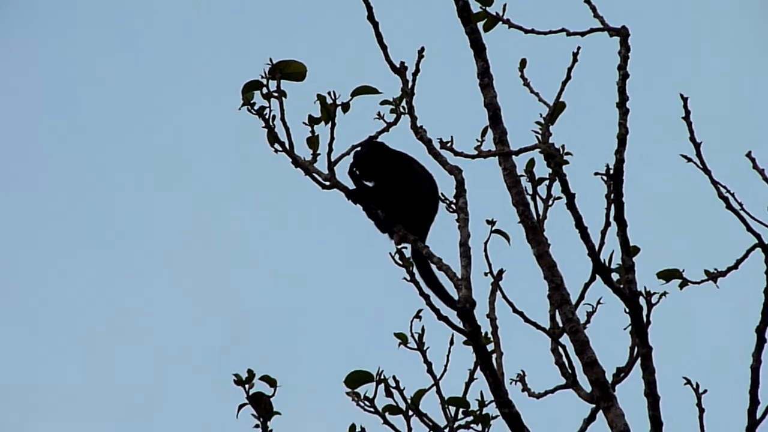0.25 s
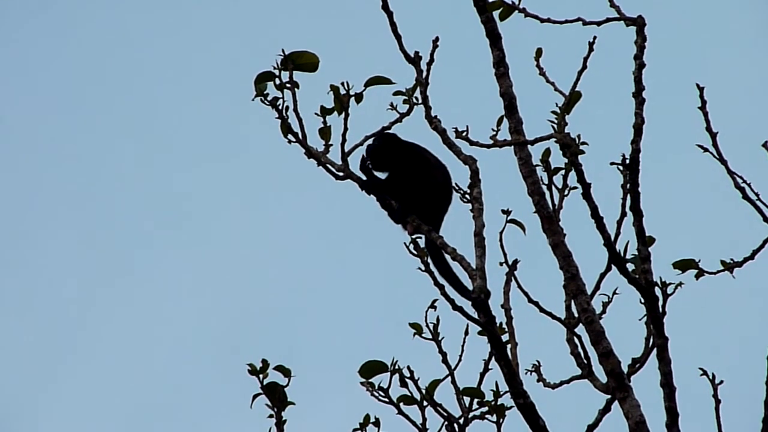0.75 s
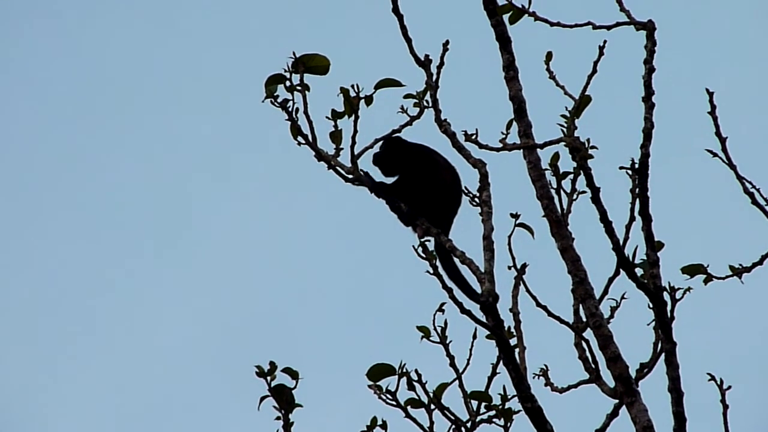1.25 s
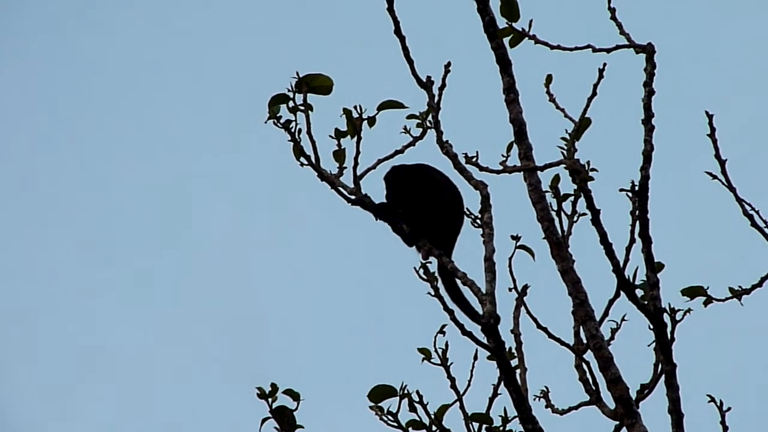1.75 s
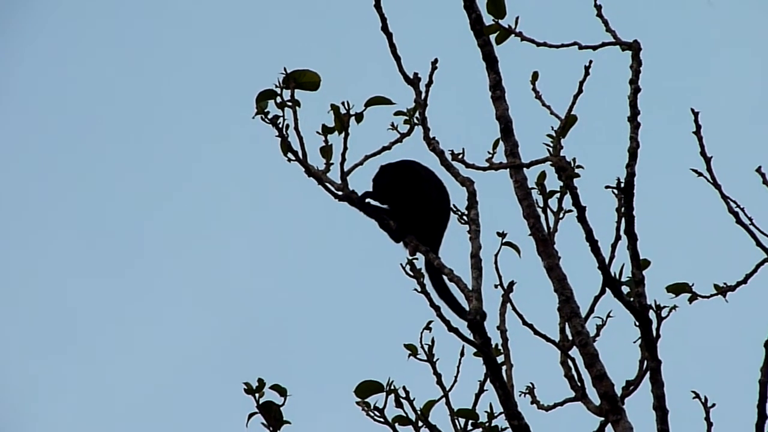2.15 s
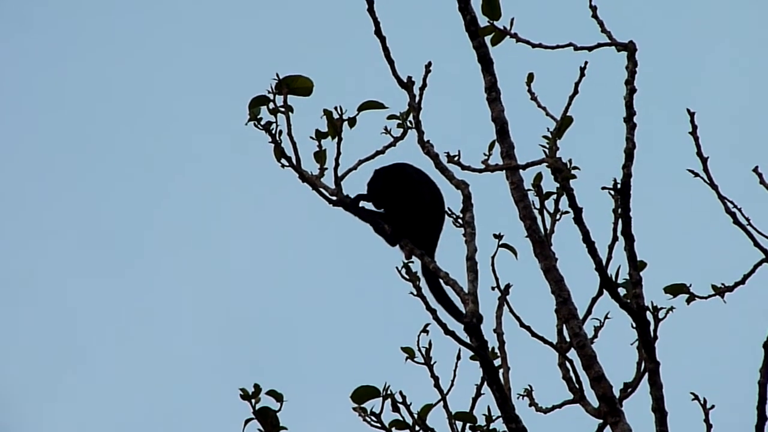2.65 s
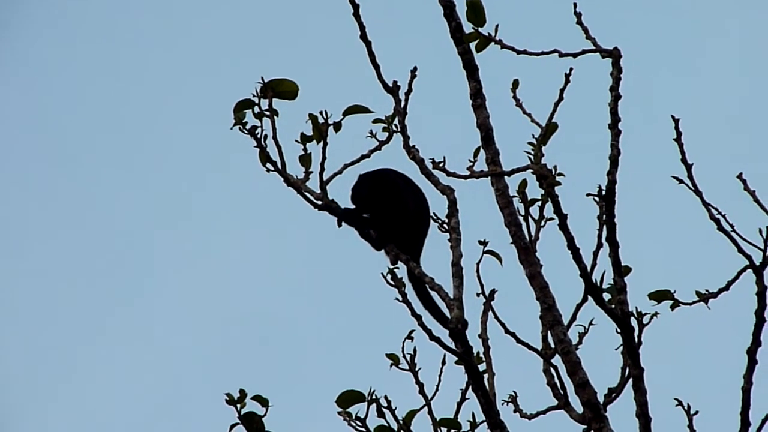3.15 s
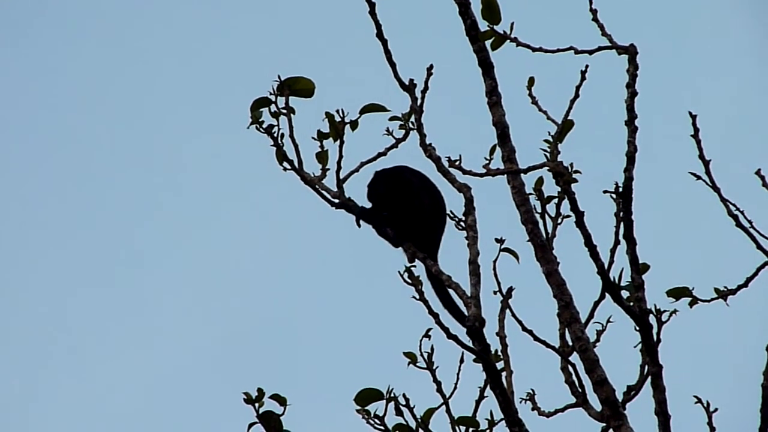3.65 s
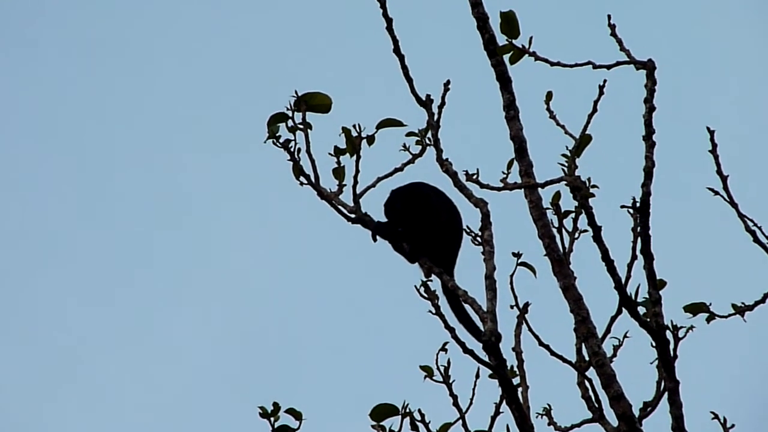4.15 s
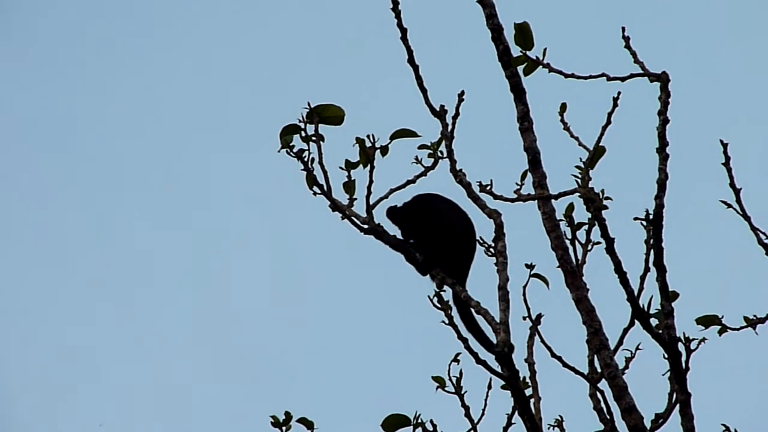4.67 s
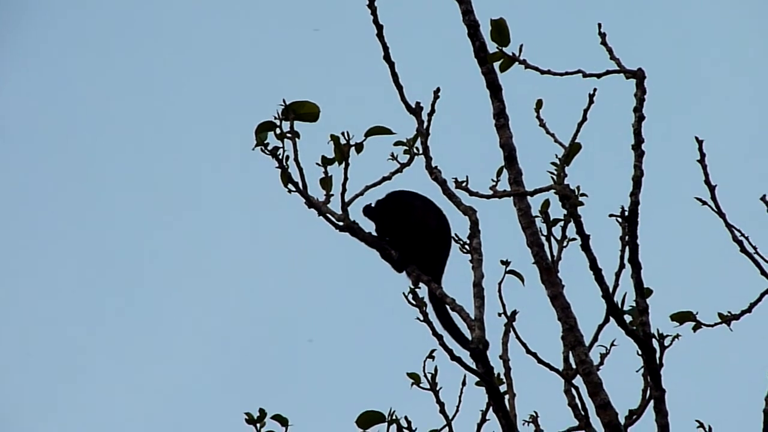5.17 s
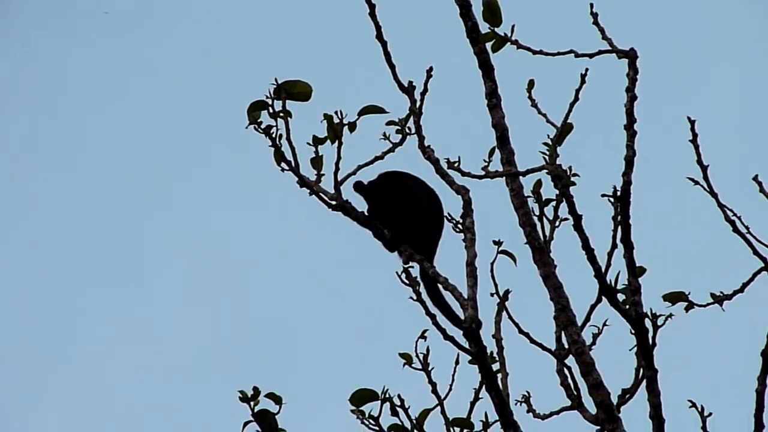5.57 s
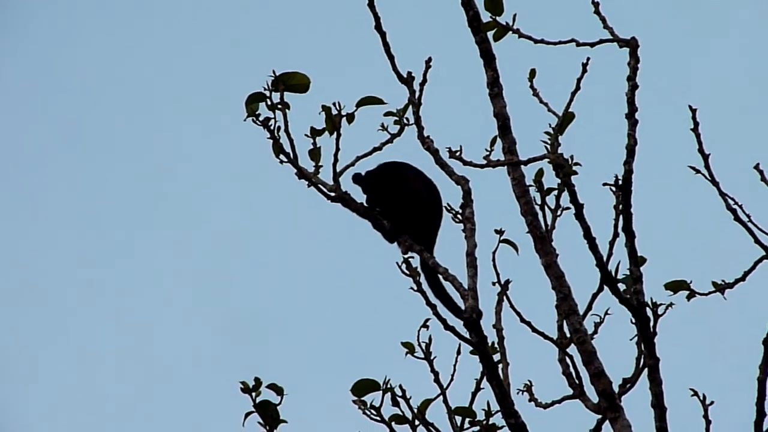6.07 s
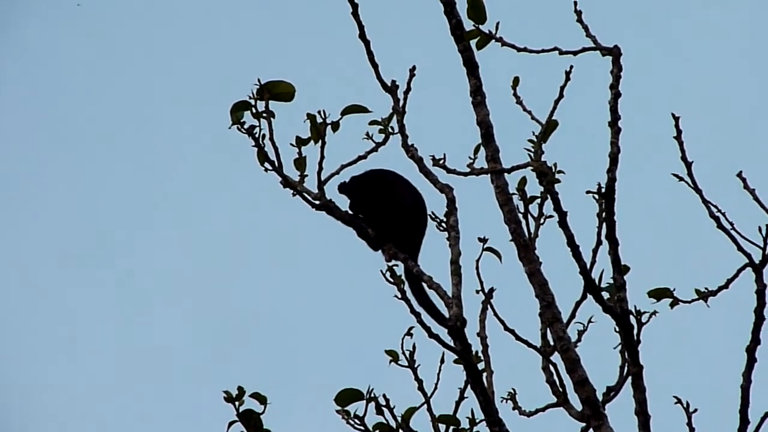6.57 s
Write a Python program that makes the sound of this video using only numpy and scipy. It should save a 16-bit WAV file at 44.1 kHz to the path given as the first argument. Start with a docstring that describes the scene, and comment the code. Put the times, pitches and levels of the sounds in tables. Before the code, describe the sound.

A bird chirps at once over a steady, high, shimmering insect drone and soft distant rush. A nearby lens motor buzzes in quick ticking steps until about 2.5 seconds. Small birds whistle and trill with forest echoes. Sharp clicks on the camera come near 3 seconds, one far louder snap just after 6, then dull bumps. Outdoor wide stereo, handheld camera microphone.

```python
"""A bird's chirp comes first, over a high drone of insects and the short buzzing steps of a lens motor.
More small birds chirp, whistle and trill, with echoes from the trunks, over a soft distant rush.
The motor stops after about 2.5 s; the camera's shell clicks, knocks, bumps and rubs in the hand.
Insects are click trains through resonances, bird notes are gliding tones, the rush is coloured noise,
the motor is a set of jittering tones, and touches on the camera are decaying modes and grainy noise."""
import sys
import numpy as np
from scipy import signal
from scipy.fft import rfft, irfft
from scipy.io import wavfile
from scipy.ndimage import uniform_filter1d

SR = 44100
rng = np.random.default_rng(int(sys.argv[2]) if len(sys.argv) > 2 else 0)


def output_pcm(signal):
    """Save a mono or channel-first signal as 16-bit PCM at the path in sys.argv[1].

    Samples are clipped to [-1, 1] before scaling.
    """
    pcm = np.clip(np.atleast_2d(signal).T, -1, 1) * 32767
    wavfile.write(sys.argv[1], SR, np.round(pcm).astype(np.int16))


N = 300762
TIME = np.arange(N) / SR
FREQ = np.maximum(np.arange(N // 2 + 1) * SR / N, 1)


def undb(db):
    """Turn decibels into a gain."""
    return 10 ** (np.asarray(db) / 20)


def unit(x):
    """Scale a sound to rms 1."""
    return x / np.sqrt(np.mean(x ** 2))


def noise():
    """White noise: all pitches equally."""
    return rng.standard_normal(N)


def walk(rate):
    """A wandering curve, rms 1: it slides in straight lines between random levels, rate per second."""
    hold = int(SR / rate)
    steps = np.repeat(rng.standard_normal(N // hold + 1), hold)
    return unit(uniform_filter1d(steps, hold)[:N])


def curves(table):
    """Draw each column after the first (time_s) as a curve over all samples."""
    time_s, *columns = np.transpose(table)
    return [np.interp(TIME, time_s, column) for column in columns]


def colour(x, points):
    """Filter by a spectrum drawn through (pitch_hz, gain_db) points."""
    hz, db = np.transpose(points)
    gain = undb(np.interp(np.log(FREQ), np.log(hz), db))
    return irfft(rfft(x) * gain, N)


def soften(x, hz):
    """A softer contact takes off the treble above about hz."""
    return signal.lfilter([1], [1, -np.exp(-2 * np.pi * hz / SR)], x)


def resonate(x, hz, width, order=3):
    """A resonance applied several times, so that sound far from its pitch fades steeply; rms 1."""
    response = 1 / (1 + 1j * (FREQ ** 2 - hz ** 2) / (FREQ * width * 2)) ** order
    return unit(irfft(rfft(x) * response, N))


def ring(hz, t60):
    """A struck mode: a sine that dies by 60 dB in t60 seconds."""
    t = TIME[:SR // 5]
    return np.sin(2 * np.pi * hz * t) * np.exp(-np.log(1000) * t / t60)


def add(track, s, x):
    """Mix x into the track at time s."""
    i = max(int(s * SR), 0)
    track[i:i + len(x)] += x[:max(N - i, 0)]


def pan(db):
    """Left and right gains for a left-minus-right level difference."""
    return undb(np.array([[1], [-1]]) * db / 2)


def ports(x, scattered=0, share=0):
    """Left and right microphone port: they differ by a quarter-cycle shift and a share of scattered sound."""
    share = np.clip(share, 0, 1)
    shifted = irfft(1j * rfft(x), N)
    side = np.sqrt(1 - share) * shifted + np.sqrt(share) * scattered
    return np.array([x + side, x - side])


# tone colour of the distant rush: pitch_hz, relative_level_db (per Hz)
FOREST = [(30, 4.5), (80, -12), (130, -9), (190, -7.5), (300, -3), (550, 0), (900, -2), (1180, -13),
          (1500, -12.5), (2200, -19.5), (3300, -20), (4800, -16.5), (7000, -33), (7900, -28.5),
          (11500, -29), (15000, -34.5)]
# narrow bands of noise in the rush: pitch_hz, width_hz, level_db
DRONES = [(129, 12, -70), (864, 69, -65)]
RUSH_DB = -54.5


def rush():
    """Far foliage and water: a wash of noise that wavers in level, with two narrow bands in it."""
    def wash():
        broad = unit(colour(noise(), FOREST)) * undb(RUSH_DB + .5 * walk(1.63))
        bands = sum(undb(db) * resonate(noise(), hz, width) for hz, width, db in DRONES)
        return broad + bands
    return ports(wash(), wash(), share=0.51)


def tymbals(groups, count=2):
    """In each group a few insects click at their own uneven rates and ring their body resonance."""
    out = 0
    for hz, width, db, rate in groups:
        clicks = np.zeros(N)
        for _ in range(count):
            own_rate = rate * (1 + .01 * rng.standard_normal() + .025 * walk(120))
            phase = np.cumsum(own_rate) / SR + rng.random()
            # one click of uneven strength each time the phase passes a whole number
            clicks += np.diff(np.floor(phase), prepend=0) * (1 + .5 * noise())
        level_db = db + 1.35 * walk(22) + walk(1.72)
        out = out + resonate(clicks, hz, width, order=5) * undb(level_db)
    return unit(out)


# insect groups, four choruses: pitch_hz, width_hz, relative_level_db, click_rate (per s)
LOW_INSECTS = [(5695, 224, -1, 400), (5560, 1250, -8.5, 230)]
MIDDLE_INSECTS = [(6150, 340, 4, 330), (6000, 1100, -9.5, 260)]
HIGH_INSECTS = [(7026, 480, 11.7, 360), (7320, 180, 5.5, 380)]
THIN_INSECTS = [(8080, 260, 0, 100)]
# levels of three choruses over time: time_s, low_db, middle_db, high_db
CHORUS = [(0, -59, -60, -59.5), (.55, -61, -57.5, -60.5), (1.1, -65, -61, -64.5), (1.5, -68, -63, -65.5),
          (1.75, -58.5, -60.5, -64.5), (2.2, -59, -64.5, -67.5), (2.85, -66.5, -61.5, -64.5),
          (3.12, -68, -63, -59), (3.4, -60.5, -61.5, -61.5), (3.8, -59.5, -61.5, -63),
          (4.27, -71, -62, -58.5), (4.6, -63, -60.5, -60), (4.9, -57, -58, -62.5), (5.35, -59.5, -59, -61),
          (6.0, -64.5, -58, -61.5), (6.45, -63, -62.5, -63), (6.82, -60, -62, -62)]
THIN_JOINS_S, THIN_DB = 3.9, -78  # the thin top group joins late


def insects():
    """Three choruses swell and sink, each on its own; the trees return them a fifth of a second later."""
    choruses = (LOW_INSECTS, MIDDLE_INSECTS, HIGH_INSECTS)
    drone = sum(undb(db) * tymbals(groups) for db, groups in zip(curves(CHORUS), choruses))
    joining = np.clip(10 * (TIME - THIN_JOINS_S), 0, 1)
    drone = drone + undb(THIN_DB) * joining * tymbals(THIN_INSECTS)
    return ports(drone, np.roll(drone, SR // 5), share=0.27)


def buzz(hz, width):
    """A tone whose pitch jitters over the given width; rms 1."""
    return np.sqrt(2) * np.sin(2 * np.pi * np.cumsum(hz + width * walk(300)) / SR)


# tones of the lens motor, before its effort: pitch_hz, width_hz, even_step_level_db, odd_step_level_db
MOTOR = [(1203, 18, -73.5, -64.5), (1590, 15.2, -67.5, -63.5), (3005, 70, -70, -86), (3200, 16, -62, -70.5),
         (3410, 81, -65.5, -69.5)]
# tick at the end of a step, before effort: pitch_hz, even_step_peak_db, odd_step_peak_db, t60_s
MOTOR_STOP = [(3650, -42, -55, 0.0083)]
# how hard the motor works: time_s, buzz_gain_db, tick_gain_db
MOTOR_EFFORT = [(0, -3, -1), (.5, 0, -3), (1.0, -1, -8), (1.5, 0, 1), (1.7, 0, -17), (2.15, 0.5, -4),
                (2.45, -2, 0)]
MOTOR_START_S, MOTOR_STEP_S, MOTOR_ON_S = .018, .08, .043
WHIRR_HZ, WHIRR_WIDTH_HZ, WHIRR_DB = 2440, 1200, -71  # the gears, under the buzz


def lens_motor(count=31):
    """The lens hunts to and fro: each direction has its own buzz, and each step stops with a tick."""
    step, within = np.divmod(TIME - MOTOR_START_S, MOTOR_STEP_S)
    is_on = (within < MOTOR_ON_S) & (step >= 0) & (step < count)
    running = uniform_filter1d(1. * is_on, size=260)  # soft starts and stops
    buzz_db, tick_db = curves(MOTOR_EFFORT)
    tones = 0
    for hz, width, even_db, odd_db in MOTOR:
        level_db = np.where(step % 2, odd_db, even_db) + walk(18)
        tones = tones + undb(level_db) * buzz(hz, width)
    tones = tones * undb(buzz_db + 1.6 * walk(5.83))
    whirr = undb(WHIRR_DB) * resonate(noise(), WHIRR_HZ, WHIRR_WIDTH_HZ)
    ticks = np.zeros(N)
    for hz, even_db, odd_db, t60 in MOTOR_STOP:
        for k in range(count):
            db = (odd_db if k % 2 else even_db) + 2 * rng.standard_normal()
            add(ticks, MOTOR_START_S + k * MOTOR_STEP_S + MOTOR_ON_S, undb(db) * ring(hz, t60))
    return ports(running * (tones + whirr) + undb(tick_db) * ticks)


# ringing modes of the shell: pitch_hz, relative_level_db, t60_s
SHELL = [(650, -17, 0.0061), (1900, -27, 0.012), (2476, 2, 0.07), (3000, 13, 0.019), (3650, 21.5, 0.01),
         (5300, 21.5, 0.008), (5970, 24, 0.008), (6530, 23.5, 0.0079), (9200, 15, 0.0066)]
CRACK_DB, CRACK_CYCLES = 2, 7.6  # the crack itself: level over the shell's ring, cycles until it has died


def click(bright_hz):
    """A dry crack and the shell's modes ringing with it; peak 1."""
    shell = soften(sum(undb(db) * ring(hz, t60) for hz, db, t60 in SHELL), bright_hz)
    crack = soften(np.diff(ring(bright_hz, CRACK_CYCLES / bright_hz), prepend=0), bright_hz)
    y = shell / np.abs(shell).max() + undb(CRACK_DB) * crack / np.abs(crack).max()
    y = soften(y, 3.0 * bright_hz)
    return y / np.abs(y).max()


# clicks and lower knocks of the shell: start_s, peak_db, brightness_hz, left_minus_right_db
CLICKS = [(1.318, -30.5, 1460, 4), (2.586, -39, 3850, 1), (2.668, -37, 3940, 1), (2.866, -19, 2880, 2),
          (2.9294, -23, 2900, 2), (2.9351, -24, 1760, 6), (2.9378, -34, 1895, 2), (2.9575, -17, 5460, -6),
          (2.9584, -16.5, 2280, 3), (2.9607, -15.5, 2900, 6), (4.039, -32, 1360, 3),
          (6.1471, -3, 5350, -1.5), (6.1482, -14, 2350, 5), (6.2904, -32.5, 1010, 1)]
# small metal part that the hardest click leaves ringing: pitch_hz, peak_db, t60_s
PING = [(2300, -43, .2)]
# dull bumps and low knocks of the camera body: start_s, peak_db, pitch_hz, left_minus_right_db
BUMPS = [(1.317, -26, 745, -5), (1.318, -29.5, 1020, 0), (1.3323, -30, 410, -2), (2.771, -37, 434, 3),
         (2.866, -33, 600, 0), (2.958, -28.5, 614, 6), (3.999, -40, 167, 2), (4.0395, -32, 308, -6),
         (6.2894, -26, 530, -5), (6.355, -28.5, 500, 3), (6.3987, -25, 447, 6), (6.4052, -23, 320, 2),
         (6.4075, -24.5, 674, -6), (6.413, -28.5, 473, 0), (6.426, -34, 378, 0), (6.6516, -25.5, 576, -10),
         (6.6548, -29, 590, -4)]
BUMP_CYCLES = 8.6  # cycles until a bump or low knock has died
# fingers rubbing on the shell: start_s, length_s, level_db (at its strongest), brightness_hz, left_minus_right_db
RUBS = [(2.259, 0.099, -47.5, 1953, 2), (6.244, 0.022, -54.5, 6000, 2), (6.316, 0.035, -57.5, 5000, 3),
        (6.399, 0.045, -44, 6000, 0), (6.648, 0.025, -46, 4000, 1)]
# tone colour of rubbing: pitch_hz, relative_level_db (per Hz)
RUB_COLOUR = [(200, -16), (900, -12), (2100, -9), (2850, 0), (4500, -7), (7000, -9), (8000, -10.5),
              (10000, -10), (15000, -23)]
# how differently the body carries these noises to the two ports: pitch_hz, side_gain_db
HAND_SIDE = [(200, 12), (700, 3), (1300, -3), (2700, -3.5), (6000, -4), (12000, -1)]
SHELL_SCATTER_S, SHELL_SCATTER_DB = .002, -11.5  # the shell smears each touch differently for the two ports


def handling():
    """The hand on the camera: decaying modes for clicks, knocks and bumps, grainy noise for rubbing."""
    out = np.zeros((2, N))
    hardest_s = max(CLICKS, key=lambda row: row[1])[0]
    touches = [(s, db, click(hz), pan_db) for s, db, hz, pan_db in CLICKS]
    touches += [(hardest_s, db, ring(hz, t60), 0) for hz, db, t60 in PING]
    touches += [(s, db, ring(hz, BUMP_CYCLES / hz), pan_db) for s, db, hz, pan_db in BUMPS]
    for s, db, sound, pan_db in touches:
        for track, gain in zip(out, pan(pan_db)):
            add(track, s, gain * undb(db) * sound)
    grains = colour(noise() * np.exp(0.39 * noise()), RUB_COLOUR)
    for s, length, db, bright_hz, pan_db in RUBS:
        u = np.maximum(TIME - s, 0) / (length / 4)
        grip = u * np.exp(1 - u)  # quick grip, slower release
        out += pan(pan_db) * undb(db) * grip * unit(soften(grains, bright_hz))
    mid = out.mean(axis=0)
    smear = noise() * np.exp(-TIME / SHELL_SCATTER_S)
    scatter = undb(SHELL_SCATTER_DB) * rfft(smear) / np.linalg.norm(smear)
    side = irfft(rfft(mid) * (1j + scatter), N)
    return out + np.array([[1], [-1]]) * colour(side, HAND_SIDE)


def whistle(length, start_hz, middle_hz, end_hz, overtone_db=-26, waver=0.011):
    """One slurred note: a nearly pure tone with a weak octave and a slightly unsteady pitch."""
    u = np.linspace(0, 1, int(length * SR))
    hz = np.polyval(np.polyfit([0, .5, 1], [start_hz, middle_hz, end_hz], 2), u)
    hz = hz * (1 + waver * np.interp(u, np.linspace(0, 1, 20), rng.standard_normal(20)))
    phase = 2 * np.pi * np.cumsum(hz) / SR
    swell = np.sqrt(2 * np.abs(np.sin(np.pi * u)))
    return swell * (np.sin(phase) + undb(overtone_db) * np.sin(2 * phase))


CHIP_S, CHIP_BEND = 0.051, .4  # length; share of the fall done by half-way
CHIP_FADE_DB = 6.5


def chip(start_hz, end_hz):
    """A short note that falls ever faster and fades as it falls."""
    middle_hz = start_hz + CHIP_BEND * (end_hz - start_hz)
    note = whistle(CHIP_S, start_hz, middle_hz, end_hz, waver=0.0196)
    return note * undb(np.linspace(0, -CHIP_FADE_DB, len(note)))


# All call levels are before the path through the forest.
# two-part calls, a slur up and at once a chip down from higher: start_s, slur_length_s, start_hz, level_db
TWEETS = [(0, 0.024, 4880, -46), (0.165, 0.036, 4440, -52.5), (2.165, 0.033, 4920, -47),
          (4.723, 0.038, 4970, -50.5), (6.517, .058, 4990, -53.5), (6.701, 0.024, 4040, -53)]
TWEET_RISE, TWEET_LEAP, TWEET_END = 1.16, 1.36, 1.06  # pitch ratios to the start: slur end, chip start, chip end
TWEET_CHIP_DB = 2.5  # chip over slur
# steep falling chips: start_s, start_hz, end_hz, level_db
CHIPS = [(0.13, 4480, 3800, -53.5), (.165, 6900, 5930, -58), (.235, 5400, 4670, -53.5),
         (.245, 4360, 3750, -52.5), (.35, 4390, 3610, -53.5), (.552, 6790, 5620, -49.5),
         (2.245, 6540, 5400, -57), (2.3, 5780, 4860, -50.5), (2.36, 5380, 4500, -51.5),
         (2.4, 4180, 3700, -54), (3.925, 5720, 5050, -60), (4.177, 7180, 6100, -55),
         (4.355, 7030, 5900, -54), (4.385, 5910, 5130, -52.5), (4.51, 6400, 5630, -54),
         (4.665, 7080, 5900, -49.5), (5.505, 6910, 6040, -46), (5.659, 6920, 5700, -53),
         (5.872, 7010, 6000, -51.5), (6.775, 4660, 3670, -55)]
# one bird's clear, nearly level whistles: start_s, length_s, pitch_hz, level_db
CLEAR_WHISTLES = [(4.695, 0.04, 4880, -58), (4.76, .06, 5060, -59), (4.86, .1, 5020, -59),
                  (5.04, 0.15, 4800, -61.5)]
# sagging, wavering whistles: start_s, length_s, start_hz, level_db
SAGGING_WHISTLES = [(3.412, 0.14, 4900, -69.5), (4.114, 0.094, 6670, -58), (4.939, 0.07, 6600, -55.5),
                    (5.236, 0.097, 6760, -57.5), (5.516, 0.0586, 6740, -54.5), (6.033, 0.098, 6740, -52.5),
                    (6.19, 0.085, 4320, -64)]
CLEAR_SAG, WAVERING_SAG = .02, 0.0499  # share of the pitch lost
# whistles that swell as they climb: start_s, length_s, start_hz, middle_hz, end_hz, level_db (at the end)
RISING_WHISTLES = [(0.487, 0.026, 4120, 4490, 4830, -48), (1.299, 0.028, 4350, 5100, 5320, -28.5),
                   (2.196, 0.034, 5500, 6370, 7070, -51), (3.775, 0.11, 3000, 3062, 3230, -56),
                   (3.88, .1, 3150, 3530, 4250, -51.5), (4.276, 0.065, 6420, 6800, 7300, -54)]
SWELL_DB = 13


def calls():
    """Tweets, chips and whistles as notes (start_s, level_db, sound), each a tone with its own glide."""
    notes = [(s, db, chip(start_hz, end_hz)) for s, start_hz, end_hz, db in CHIPS]
    for s, length, hz, db in TWEETS:
        notes.append((s, db, whistle(length, hz, hz * np.sqrt(TWEET_RISE), hz * TWEET_RISE)))
        notes.append((s + length, db + TWEET_CHIP_DB, chip(hz * TWEET_LEAP, hz * TWEET_END)))
    for s, length, hz, db in CLEAR_WHISTLES:
        notes.append((s, db, whistle(length, hz, hz, hz * (1 - CLEAR_SAG), waver=0.0097)))
    for s, length, hz, db in SAGGING_WHISTLES:
        note = whistle(length, hz, hz * (1 - WAVERING_SAG / 2), hz * (1 - WAVERING_SAG), waver=0.0188)
        notes.append((s, db, note))
    for s, length, *contour, db in RISING_WHISTLES:
        note = whistle(length, *contour)
        notes.append((s, db, note * undb(np.linspace(-SWELL_DB, 0, len(note)))))
    return notes


# trills, two that sink and fade and a very high, faint one that climbs, before the path through the forest:
# start_s, length_s, first_pitch_hz, first_level_db, note_rate (per s), sag (Hz per s), fade (dB per s),
# slur (share of the pitch), octave_db
TRILLS = [(1.388, .17, 4950, -40.5, 20, 2900, 30, .05, -24),
          (2.196, .62, 4520, -42, 22.6, 600, 20, .04, -19), (4.57, .3, 9600, -66, 22, -2000, 0, -.035, -60)]
TRILL_NOTE_S = .021


def trills(uneven_db=1.0):
    """Evenly spaced, rounded, slurred notes (start_s, level_db, sound) whose pitch drifts along the trill."""
    notes = []
    for s, length, first_hz, first_db, rate, sag, fade, slur, overtone_db in TRILLS:
        for age in np.arange(0, length, 1 / rate):
            hz = (first_hz - sag * age) * (1 + 0.011 * rng.standard_normal())
            note = whistle(TRILL_NOTE_S, hz * (1 + slur), hz, hz * (1 - 1.7 * slur), overtone_db, waver=0.021)
            note = note * np.hanning(len(note)) ** 0.17
            db = first_db - fade * age + uneven_db * rng.standard_normal()
            notes.append((s + age, db, note))
    return notes


LEAF_SMEAR_S, LEAF_SHARE = .005, .22  # blur by twigs: decay time, share of the power


def leaves(x):
    """The straight path, partly scattered by twigs close to it."""
    smear = noise()[:SR // 10] * np.exp(-TIME[:SR // 10] / LEAF_SMEAR_S)
    blurred = signal.fftconvolve(x, smear / np.linalg.norm(smear))[:N]
    return np.sqrt(1 - LEAF_SHARE) * x + np.sqrt(LEAF_SHARE) * blurred


FOREST_T60_S = 0.74


def trunks(x, leaves_hz=9000):
    """Sound scattered by trunks: dense, uneven echoes that die away; leaves soak up the top."""
    uneven = noise() * np.exp(0.47 * noise())
    decay = np.exp(-np.log(1000) * TIME / FOREST_T60_S)
    echoes = uneven * decay * (1 - np.exp(-TIME / 0.00091))
    dull = signal.sosfilt(signal.butter(4, leaves_hz, fs=SR, output="sos"), x)
    return signal.fftconvolve(dull, echoes[:SR] / np.linalg.norm(echoes))[:N]


DIRECT_DB, ECHO_DB = 3, 2.5  # gains of the straight sound and the echo
HIDDEN, NEAR_BIRD_DB = .42, -30  # extra dB lost on the straight path for each dB below the near level
TRILL_CLEAR_DB = 3


def birds():
    """Calls and trills, each followed by the forest's echo; the trilling birds sit more in the open."""
    song, direct = np.zeros(N), np.zeros(N)
    for notes, clear_db in ((calls(), 0), (trills(), TRILL_CLEAR_DB)):
        for s, db, note in notes:
            add(song, s, undb(db) * note)
            # fainter birds sit deeper in the foliage, so less of them arrives in a straight line
            hidden_db = HIDDEN * min(db - NEAR_BIRD_DB, 0)
            add(direct, s, undb(db + clear_db + hidden_db) * note)
    straight = undb(DIRECT_DB) * ports(leaves(direct))
    echo = undb(ECHO_DB) * ports(trunks(song), trunks(song), share=0.16)
    return straight + echo


FOREST_RIGHT_DB = 2


def scene():
    """The forest lies a little to the right; the camera's own noises are added without that shift."""
    forest = rush() + insects() + birds()
    return pan(-FOREST_RIGHT_DB) * forest + lens_motor() + handling()


# stereo widening of the microphone: pitch_hz, side_gain_db
WIDTH = [(60, 0), (120, -14), (220, -14), (400, -8), (700, 1), (1300, 10.5), (2400, 9), (4500, 7),
         (8000, 5.5), (14000, -1)]
LOW_CUT_HZ, TOP_HZ = 200, 15700


def record(dry):
    """The camera cuts the rumble, widens its closely spaced ports, clips at full scale and cuts the top."""
    left, right = signal.sosfilt(signal.butter(2, LOW_CUT_HZ, "high", fs=SR, output="sos"), dry)
    mid = (left + right) / 2
    side = colour((left - right) / 2, WIDTH)
    wide = np.clip([mid + side, mid - side], -1, 1)
    return signal.sosfilt(signal.ellip(8, .2, 70, TOP_HZ, fs=SR, output="sos"), wide)


dry = scene()
out = record(dry)
output_pcm(out)
```